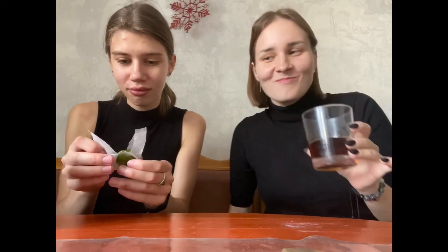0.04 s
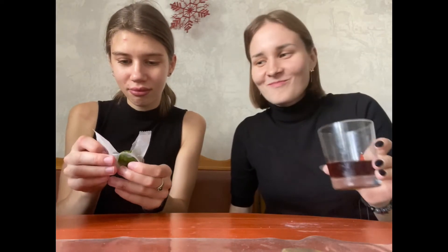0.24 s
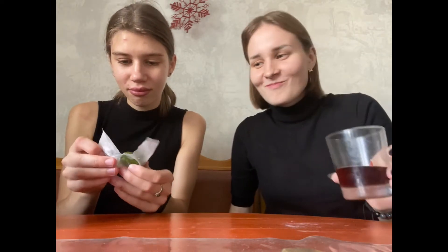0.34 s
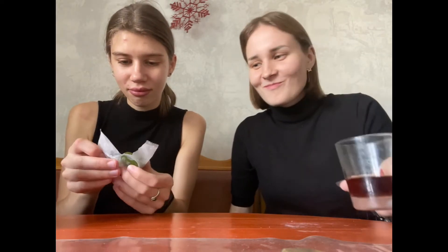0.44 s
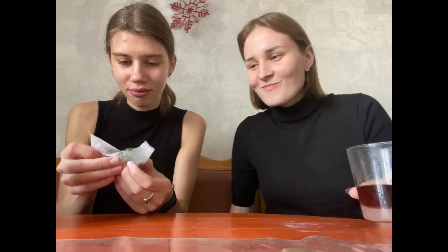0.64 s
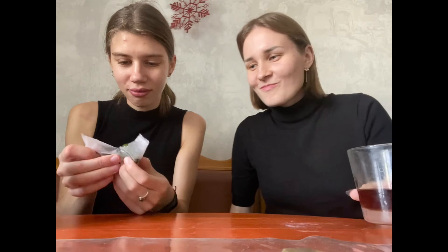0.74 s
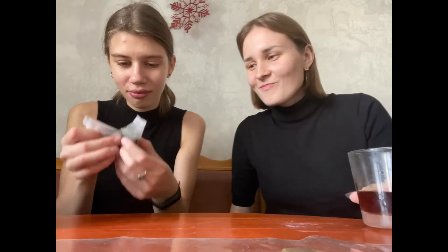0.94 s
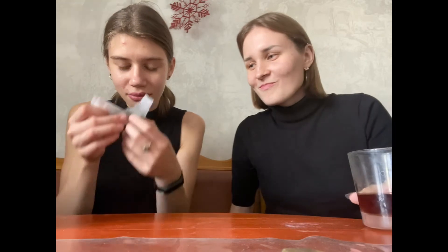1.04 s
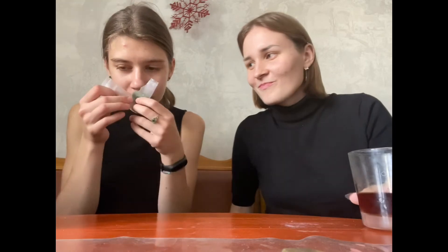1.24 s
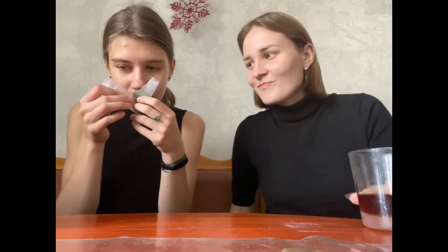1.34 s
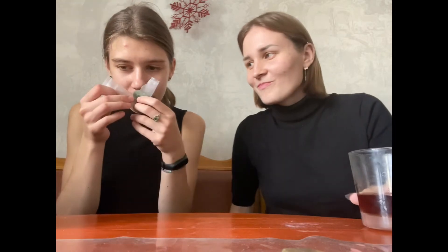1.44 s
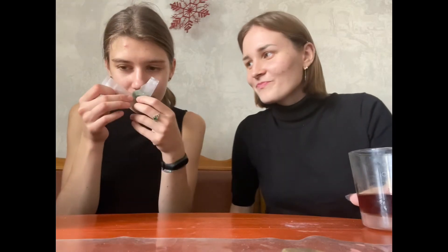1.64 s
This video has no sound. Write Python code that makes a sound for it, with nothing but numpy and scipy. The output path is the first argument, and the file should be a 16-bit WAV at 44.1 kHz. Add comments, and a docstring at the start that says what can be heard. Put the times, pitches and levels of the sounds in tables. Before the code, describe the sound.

A thin wrapper crinkles as a sweet is unwrapped by hand. A bunch of sharp crackles comes as it tears, then scattered ticks and a dull snap as it pulls taut, close by in a small, quiet room.

```python
"""Unwrapping a sweet

A sweet is unwrapped by hand at a table in a small, hard-walled room. Creases of the thin wrapper
buckle in sharp crackles, bunched where it tears, and the film rustles as it slides. Fingers tap
hollowly; near one second the film snaps taut with a dull thump. The room rings over a quiet hum."""
import sys
import numpy as np
from scipy import signal
from scipy.fft import rfft, irfft
from scipy.io import wavfile

SR = 44100
rng = np.random.default_rng(int(sys.argv[2]) if len(sys.argv) > 2 else 0)


def to_wav(sig):
    """Store sig (one row per channel, or 1-D mono) as 16-bit WAV at the path in sys.argv[1].

    Samples outside -1..1 are clipped; the rate is SR.
    """
    pcm = np.clip(np.atleast_2d(sig), -1, 1) * 32767
    pcm = np.round(pcm).astype(np.int16)
    wavfile.write(sys.argv[1], SR, pcm.T)  # frames by channels


N = 74970


def undb(db):
    """Decibels to gain."""
    return 10 ** (np.asarray(db) / 20)


def unit(x):
    """Scale to rms 1."""
    return x / np.sqrt(np.mean(x ** 2) + 1e-20)


def on_log_axis(hz, points):
    """Read a curve of (freq_hz, value) points on a log-frequency axis."""
    freqs, values = np.array(points).T
    return np.interp(np.log(hz + 1e-6), np.log(freqs), values)


def colour(x, points):
    """EQ a sound with a curve of (freq_hz, gain_db) points."""
    hz = np.fft.rfftfreq(len(x), 1 / SR)
    return irfft(rfft(x) * undb(on_log_axis(hz, points)), len(x))


def band(x, lo_hz, hi_hz, order=3):
    """Band-pass filter."""
    return signal.sosfilt(signal.butter(order, [lo_hz, hi_hz], "band", fs=SR, output="sos"), x)


def low_cut(x, hz, order):
    """High-pass filter."""
    return signal.sosfilt(signal.butter(order, hz, "high", fs=SR, output="sos"), x)


def resonate(x, hz, q, boost_db):
    """Lift one resonance out of a sound."""
    return x + (undb(boost_db) - 1) * signal.lfilter(*signal.iirpeak(hz, q, fs=SR), x)


def add(out, start_s, x):
    """Mix a sound in at a time."""
    i = int(start_s * SR)
    out[i:i + len(x)] += x[:max(len(out) - i, 0)]


# Room tone EQ: freq_hz, gain_db
AIR_EQ = [(30, -29.5), (55, -11), (85, -6), (120, -7.5), (185, -5), (300, -4), (365, -11), (490, -8),
          (760, -14), (1160, -13.5), (1500, -24), (4650, -30.5), (9500, -32), (13500, -38.5),
          (14800, -48.5), (16000, -72)]


def room_air(level_db=-59):
    """Still air lays a soft, dark bed of noise."""
    return undb(level_db) * unit(colour(rng.standard_normal(N), AIR_EQ))


# Fader ride of the hum: time_s, level_db
HUM_RIDE = [(0, -69), (.25, -58), (.6, -68), (.9, -59.5), (1.2, -61), (1.35, -85), (1.7, -63.5)]


def hum(pitch_hz=227.3, width_hz=5, waver_depth=0.71):
    """A low tone swells and dips; narrow noise around its pitch makes it waver."""
    t = np.arange(N) / SR
    waver = band(rng.standard_normal(2 * N), pitch_hz - width_hz / 2, pitch_hz + width_hz / 2, order=2)
    tone = np.sin(2 * np.pi * pitch_hz * t) + waver_depth * unit(waver[N:])
    return unit(tone) * undb(np.interp(t, *np.array(HUM_RIDE).T))


# Reverb EQ: freq_hz, gain_db
REVERB_EQ = [(50, 12.5), (150, 1), (420, 2), (900, -1), (1350, 0), (2000, -7), (3000, -4.5), (4700, 2),
             (7000, -2), (9000, 0.5), (12500, -2.5), (16000, -15)]
# Reverb decay: freq_hz, t60_s
REVERB_DECAY = [(100, .75), (250, 0.3), (600, 0.26), (1400, .52), (4500, .62), (10000, .4), (16000, 0.16)]


def room_reverb(send, predelay_s=0.003, build_s=0.015):
    """Echoes off hard walls build up quickly and die at their own rate in each band."""
    t = np.arange(SR) / SR
    hz = np.fft.rfftfreq(SR, 1 / SR)
    edges_hz = np.geomspace(45, 16000, 14)
    spectrum = rfft(colour(rng.standard_normal(SR), REVERB_EQ))
    build = np.clip((t - predelay_s) / build_s, 0, 1)
    response = np.zeros(SR)
    for lo, hi in zip(edges_hz, edges_hz[1:]):
        t60_s = on_log_axis(np.sqrt(lo * hi), REVERB_DECAY)
        fade = build * np.exp(-np.log(1000) * t / t60_s)
        noise = irfft(spectrum * (hz >= lo) * (hz < hi), SR)
        response += noise * fade / np.sqrt(np.sum(fade ** 2))
    return signal.fftconvolve(send, response)[:N]


def knock(hits, modes, push_s):
    """Soft pushes ring a few heavily damped modes."""
    t = np.arange(SR // 10) / SR
    ring = sum(undb(db) * np.sin(2 * np.pi * hz * t) * np.exp(-np.log(1000) * t / t60_s)
               for hz, db, t60_s in modes)
    blow = np.convolve(ring, np.hanning(int(push_s * SR) + 2))
    out = np.zeros(N)
    for start_s, gain_db in hits:
        add(out, start_s, undb(gain_db) * blow / np.abs(blow).max())
    return out


# Tap cues: start_s, gain_db
TAP_CUES = [(.6790, -26.5), (1.2478, -37), (1.6655, -42.5), (1.6870, -48)]
# Hollow body of a tap: pitch_hz, gain_db, t60_s
TAP_BODY = [(560, -6, 0.014), (797, 8.5, 0.011), (1050, 0, 0.015)]


def finger_taps():
    """Fingers tap with a short, hollow midrange ring."""
    return band(knock(TAP_CUES, TAP_BODY, push_s=0.0004), 404, 16500, order=2)


# Thump cues: start_s, gain_db
THUMP_CUES = [(0.9858, -38.5), (0.9911, -20.5), (0.9981, -27), (1.0067, -55), (1.0130, -43),
              (1.0421, -37.5), (1.6650, -44.5), (1.6888, -51)]
# Dull body of a thump: pitch_hz, gain_db, t60_s
THUMP_BODY = [(136.5, -21, 0.061), (286, 5.5, .024), (413, 7.5, 0.027), (598, -9.5, 0.0059),
              (820, -12.5, 0.0052)]


def hand_thumps():
    """Hands and sweet knock dully, hardest as the wrapper snaps taut."""
    return low_cut(knock(THUMP_CUES, THUMP_BODY, push_s=0.00047), hz=74, order=3)


# Ring of the wrapper: pitch_hz, width_hz, boost_db
FILM_RESONANCES = [(1380, 100, 8.5), (2020, 260, 4.5), (4700, 520, 9), (11100, 3700, 11)]


def film_ring(x):
    """The film's resonances stand out of its broad response."""
    for pitch_hz, width_hz, boost_db in FILM_RESONANCES:
        x = resonate(x, pitch_hz, pitch_hz / width_hz, boost_db)
    return x


# Rustle EQ: freq_hz, gain_db
RUSTLE_EQ = [(200, -6.5), (700, 0), (1400, 2.5), (4000, -5), (8000, -12), (16000, -30.5)]
# Slides of the film: start_s, length_s, level_db, resonance_hz
RUSTLE_CUES = [(.0, 0.054, -61, 5200), (0.042, 0.1, -63.5, 2340), (.13, 0.052, -56.5, 5640),
               (.17, 0.088, -61, 4700), (0.269, 0.035, -39, 5800), (0.295, 0.0366, -44, 3300),
               (0.529, 0.024, -45, 1880), (0.592, 0.0099, -54, 4200), (0.717, 0.04, -56, 2560),
               (0.799, 0.01, -62.5, 3040), (.838, .036, -66.5, 12700), (0.894, .01, -63.5, 4700)]


def film_rustle(clicks_per_s=3500, spread_db=2.5):
    """Dense tiny clicks swell and fade as the film slides under the fingers."""
    sizes = undb(spread_db * np.minimum(rng.exponential(size=N), 4))
    signs = rng.choice([-1, 1], N)
    fires = rng.random(N) < clicks_per_s / SR
    grains = film_ring(colour(sizes * signs * fires, RUSTLE_EQ))
    out = np.zeros(N)
    for start_s, length_s, level_db, resonance_hz in RUSTLE_CUES:
        envelope = np.zeros(N)
        add(envelope, start_s, undb(level_db) * signal.windows.tukey(int(length_s * SR), 0.5))
        out += envelope * unit(resonate(grains, resonance_hz, q=5.1, boost_db=6))
    return out


# Broad tone of the film: freq_hz, gain_db
FILM_EQ = [(200, -3), (700, -3.5), (3000, -3), (8000, -3), (13000, 3), (16500, -3.5)]


def buckle(decay_s, snap_db=14, shiver_db=-13.5, shiver_s=0.0064):
    """A crease gives way: a snap, a short burst and a faint shiver of the film."""
    t = np.arange(2048) / SR
    envelope = np.exp(-t / decay_s) + undb(shiver_db) * np.exp(-t / shiver_s)
    burst = rng.choice([-1, 1], len(t)) * envelope
    burst[2] += undb(snap_db)
    return colour(burst, FILM_EQ)[:1024]


# Borders of the low, mid, high and top crackle bands: edge_hz
CRACKLE_BANDS = [560, 1700, 3600, 7500, 16500]


def balance(burst, levels_db, window_s=0.003):
    """Set each band's level, counting its energy as if it all fell within the window."""
    parts = [band(burst, lo, hi) for lo, hi in zip(CRACKLE_BANDS, CRACKLE_BANDS[1:])]
    return sum(undb(db) * part * np.sqrt(window_s * SR / np.sum(part ** 2))
               for db, part in zip(levels_db, parts))


# Buckling creases: start_s, pitch_hz, low_db, mid_db, high_db, top_db, decay_ms, send_db
CRACKLE_CUES = [(0.0341, 1380, -46, -53.5, -71, -91, 1.4, -1.5),
                (0.0502, 3370, -52, -54, -51.5, -79, 0.4, -12),
                (.0547, 12500, -71, -60, -71, -55, 1.6, -10), (0.152, 6200, -57, -54, -47.5, -58, 1.5, -7),
                (.1560, 1380, -53.5, -52, -52, -69, 1.8, 0.5),
                (0.2396, 14400, -43.5, -37, -34.5, -40, 2.4, -5.5),
                (.2452, 4400, -45, -41, -41.5, -61, 0.53, -12),
                (0.253, 11500, -61.5, -58, -44.5, -50, .8, -6.5),
                (0.2583, 1510, -57, -40.5, -64, -68, 1.4, -5.5),
                (0.2748, 4700, -39, -33.5, -37, -41, 0.73, -7.5),
                (0.2816, 4500, -42, -30, -24.5, -27.5, 0.68, -9),
                (0.2846, 5150, -33, -33.5, -19.5, -35, 2.5, -7.5),
                (0.2947, 1390, -33, -29, -32, -48, 0.5, -11.5),
                (.3046, 2020, -35, -25.5, -28.5, -54, 0.62, -12),
                (0.3074, 1380, -26.5, -34, -31.5, -45, 0.58, -13.5),
                (.3154, 11400, -50, -33.5, -37, -32.5, 1.4, -3),
                (.3221, 1380, -40.5, -39.5, -39, -50, 0.65, -9.5),
                (0.4066, 4130, -72, -69, -56, -52.5, .7, 3),
                (0.4211, 4560, -50, -43.5, -32.5, -46, 2.3, -7.5),
                (.4460, 4450, -50, -60, -38.5, -64, 0.96, -8),
                (0.4491, 2650, -39, -36, -35, -48, 0.82, -12.5),
                (0.459, 4700, -58, -50, -49.5, -63, 0.92, 7), (0.532, 4700, -62, -59, -47.5, -57, 1.8, -2),
                (0.5373, 1380, -46.5, -42.5, -46.5, -52.5, 1.1, -3.5),
                (0.5443, 1500, -39.5, -52, -47, -69, 1.4, -26.5),
                (0.6238, 7300, -52.5, -47.5, -39.5, -40.5, 2.7, -6.5),
                (0.6309, 2860, -47, -40, -42.5, -56, 1.3, -2.5),
                (.6790, 1090, -42.5, -46.5, -52, -63, 2, -7),
                (0.7112, 3470, -48, -41, -44.5, -72, 0.51, -4),
                (.9924, 4700, -43.5, -33, -26, -28, 0.5, -12.5),
                (1.1655, 7900, -50.5, -45.5, -42.5, -46.5, 0.47, -9),
                (1.2480, 2220, -49.5, -42.5, -42, -58, 0.27, -7),
                (1.5234, 10370, -71, -90.5, -82, -59, 1.2, -17.5)]


def crackles():
    """Each buckling facet rings at its own pitch; the room gathers it from all sides as a smooth snap."""
    direct, send = np.zeros(N), np.zeros(N)
    smooth_snap = colour(signal.unit_impulse(2048, 16), FILM_EQ)[:1024]
    for start_s, pitch_hz, *levels_db, decay_ms, send_db in CRACKLE_CUES:
        facet = resonate(buckle(decay_ms / 1000), pitch_hz, q=2.8, boost_db=8.5)
        add(direct, start_s, balance(film_ring(facet), levels_db))
        add(send, start_s, undb(send_db) * balance(smooth_snap, levels_db))
    return direct, send


def scene():
    """Wrapper and hands, heard directly and through the room, over air and hum."""
    crackle, crackle_send = crackles()
    rustle = film_rustle()
    thumps = hand_thumps()
    taps = finger_taps()
    reverb = room_reverb(crackle_send + undb(-8) * (rustle + thumps) + undb(-10.5) * taps)
    return (room_air() + hum() + reverb + taps + thumps + rustle + crackle)[None]


def record(dry):
    """Trim the deepest rumble and the very top."""
    high_cut = signal.ellip(8, 0.2, 70, 16500, fs=SR, output="sos")
    return signal.sosfilt(high_cut, low_cut(dry, hz=40, order=5))


dry = scene()
out = record(dry)
to_wav(out)
```